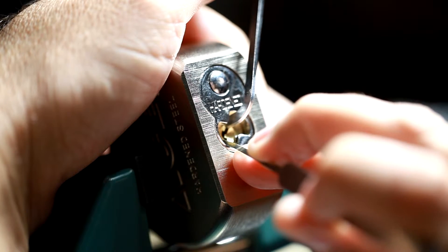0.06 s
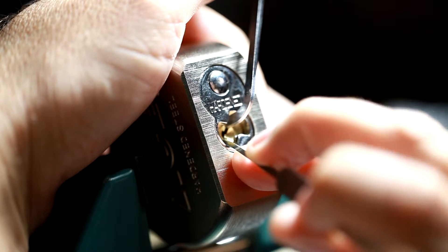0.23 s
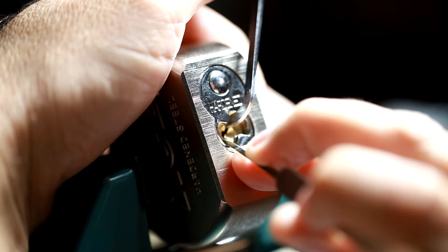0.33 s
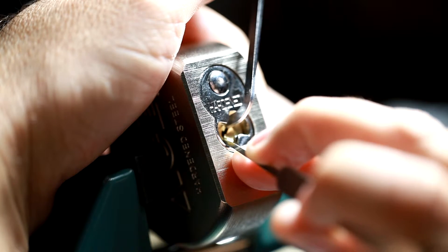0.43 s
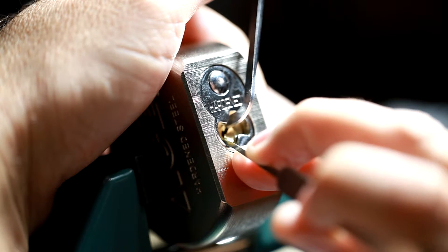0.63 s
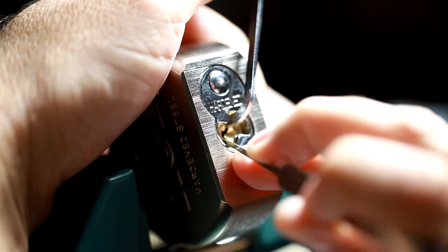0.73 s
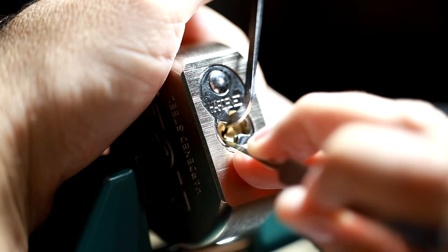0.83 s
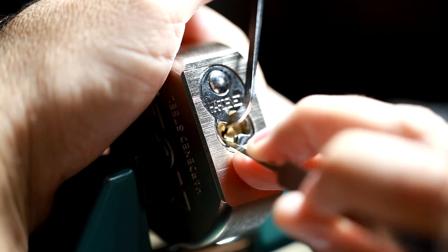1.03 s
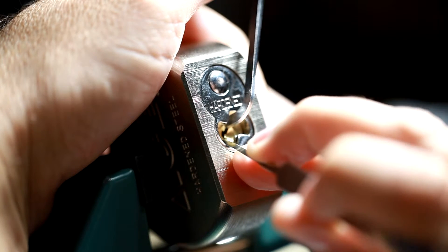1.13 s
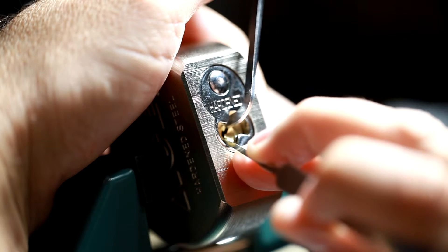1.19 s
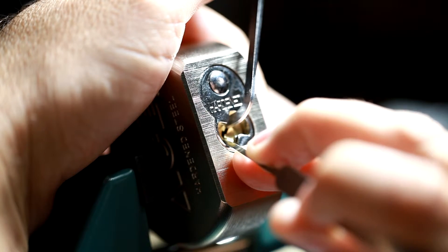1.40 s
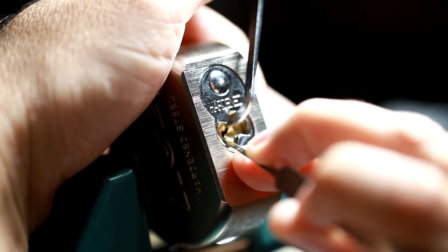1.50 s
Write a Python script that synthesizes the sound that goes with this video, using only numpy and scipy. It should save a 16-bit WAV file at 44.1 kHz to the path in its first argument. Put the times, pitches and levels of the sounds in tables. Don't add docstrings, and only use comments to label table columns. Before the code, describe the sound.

A padlock pin snaps with one sharp bright click as thin picks work it, over faint hiss

```python
import sys
import numpy as np
from scipy import signal
from scipy.fft import rfft, irfft
from scipy.io import wavfile

SR = 44100
rng = np.random.default_rng(int(sys.argv[2]) if len(sys.argv) > 2 else 0)


def decibels_to_gain(level_db):
    exponent = np.asarray(level_db, float) / 20
    return 10 ** exponent


def unload_audio(sound):
    columns = np.transpose(np.atleast_2d(sound))
    steps = np.round(np.clip(columns, -1, 1) * 32767)
    wavfile.write(sys.argv[1], SR, steps.astype(np.int16))


N = 68355


def rms_one(x):
    return x / np.sqrt(np.mean(x ** 2) + 1e-20)


def at_hz(rows, hz, column=1):
    rows = np.array(rows)
    return np.interp(np.log(hz), np.log(rows[:, 0]), rows[:, column])


def ring(clicks, hz, t60):
    radius = np.exp(-np.log(1000) / (t60 * SR))
    angle = 2 * np.pi * hz / SR
    poles = [1, -2 * radius * np.cos(angle), radius * radius]
    return signal.lfilter([0, np.sin(angle)], poles, clicks + 1e-18)


def body(clicks, modes):
    return sum((-1) ** k * decibels_to_gain(db) * ring(clicks, hz, t60) for k, (hz, db, t60) in enumerate(modes))


def clicks_at(rows):
    out = np.zeros(N)
    for s, db in rows:
        out[int(s * SR)] += decibels_to_gain(db)
    return out


def drift(rate):
    r = np.exp(-2 * np.pi * rate / SR)
    wander = signal.lfilter([1], [1, -2 * r, r * r], rng.standard_normal(N + SR))
    return rms_one(wander[SR:])


# (frequency [Hz], level [dB rms])
HUM = [(120, -74), (240, -82), (360, -86), (1953, -80), (2930, -107.5), (3906, -91.5)]
# (frequency [Hz], density [dB per Hz])
HISS = [(20, 2), (45, 1), (150, -7), (500, -6.5), (1000, -12), (3000, -17), (8000, -18.5), (16500, -20.5)]


def background():
    hz = np.maximum(np.fft.rfftfreq(N, 1 / SR), 1)
    hiss = rms_one(irfft(rfft(rng.standard_normal(N)) * decibels_to_gain(at_hz(HISS, hz)), N))
    t = np.arange(N) / SR
    tones = sum(np.sqrt(2) * decibels_to_gain(db) * np.sin(2 * np.pi * (f * t + rng.random())) for f, db in HUM)
    return decibels_to_gain(-65.5) * hiss + tones


# (frequency [Hz], tick level [dB], rubbing level [dB], t60 [s])
MOUNT = [(611.4, -24, 6.5, 0.017), (858, -24, -9.5, .05), (1172.7, -15.5, -4.5, 0.16),
         (1262, -24, -10, 0.28), (1422, -17, -7.5, 0.04), (1889, 3, 1, .04), (2273, 0, -5, 0.09),
         (2394, -19, -13.5, 0.071), (2707, 9, 5.5, 0.042), (3620, -11, -12, 0.017)]
# (time [s], level [dB])
PRESSURE = [(0, -3), (.1, 4.5), (.18, -1), (.3, 0.5), (.4, -1.5), (.65, 4), (.72, -1), (.81, 2), (.95, -1),
            (1.08, 1), (1.221, -0.5), (1.271, 3.5), (1.38, -1), (1.472, 0), (1.55, -1)]


def rubbing():
    level_db, slips_per_s, uneven_db = -65.5, 900, 3.5
    surge_db, surges_per_s = -1, 9.8
    sizes = decibels_to_gain(uneven_db * np.minimum(rng.exponential(1, N), 4)) * rng.choice([-1, 1], N)
    slipping = rng.random(N) < slips_per_s / SR
    pressure_db = np.interp(np.arange(N) / SR, *np.transpose(PRESSURE))
    slips = sizes * slipping * decibels_to_gain(pressure_db + surge_db * drift(surges_per_s))
    modes = [(hz, db, t60) for hz, _, db, t60 in MOUNT]
    return decibels_to_gain(level_db) * rms_one(body(slips, modes))


# (time [s], mount level [dB], bright level [dB], extra on low modes [dB])
TICKS = [
    (0.1214, -54, -54, 5),
    (0.2692, -54.5, -62, 6.5),
    (1.4293, -55, -55, 6.5),
    (1.537, -75, -73, 24.5),
]
# (delay [s], bright level [dB], mount level [dB])
CONTACTS = [
    (0, 0, -11),
    (.0006, -10, -14),
    (.0015, -0.5, 2.5),
    (.0031, 1, -9),
    (.0058, -8, -18.5),
]
# (frequency [Hz], level [dB], t60 [s])
PICK = [(3900, -1, 0.0033), (5270, -2.5, 0.0084), (6160, 2, 0.0032), (7150, 0, .003), (8400, 5.5, 0.004),
        (8740, -3, 0.0038), (10400, -5, .003), (12500, -5, .002)]


def ticks():
    touches = [(s + lag, high_db + db) for s, _, high_db, _ in TICKS for lag, db, _ in CONTACTS]
    out = body(clicks_at(touches), PICK)
    for s, mount_db, _, low_db in TICKS:
        modes = [(hz, db + low_db * (hz < 1500), t60) for hz, db, _, t60 in MOUNT]
        pushes = clicks_at([(s + lag, mount_db + db) for lag, _, db in CONTACTS])
        out = out + body(pushes, modes)
    return out


# (frequency [Hz], level [dB], t60 [s])
LOCK = [(1637, -26, 0.016), (2505, -23.5, 0.0083), (3890, -17.5, .006), (4710, -20, 0.00664),
        (6025, -17.5, .008), (6860, -11.5, .008), (7420, -6.5, 0.0121), (8300, 0.5, 0.0048),
        (9130, -2.5, 0.00492), (10800, -24, 0.0084), (11950, -26, .006), (12400, -16, 0.0054),
        (13160, -24, .006), (15350, -23, .005)]


def snap(damping=1):
    first_s, second_delay_s = .20795, .00036
    touches = clicks_at([(first_s, -17), (first_s + second_delay_s, -8.5)])
    return body(touches, [(hz, db, t60 * damping) for hz, db, t60 in LOCK])


KNOCKS_S = [.2095, .2174, .2535, .2670, .2800]
# (level [dB], cutoff [Hz])
THUMPS = [
    (-36, 1500),
    (-29, 240),
    (-56.5, 320),
    (-59.5, 500),
    (-47.5, 500),
]
# (frequency [Hz], level [dB], t60 [s])
VICE = [(120.3, -9, 0.024), (261.4, -5, 0.018), (373, -2.5, .05), (533, -5.5, 0.035), (816.6, -10.5, .04),
        (1378, -11.5, 0.048)]


def vice():
    knocks = np.zeros(N)
    for s, (db, cut_hz) in zip(KNOCKS_S, THUMPS):
        softness = signal.butter(1, cut_hz, fs=SR, output="sos")
        knocks = knocks + signal.sosfilt(softness, clicks_at([(s, db)]))
    return body(knocks, VICE)


# (frequency [Hz], level [dB], t60 [s])
ROOM = [(304.6, -31, 0.55), (1300, -25.5, 0.35), (2990, -31, 0.35), (5930, -23, 0.33), (8300, -37.5, 0.37),
        (11100, -40.5, 0.37), (15810, -24.5, 0.1407)]
# (delay [s], level [dB])
REFLECTIONS = [(.0040, -32.5), (.0082, -25), (.0225, -36)]


def room(x):
    first_echo_s, early_db, early_t60_s = .0016, 4.5, .025
    t = np.arange(SR // 2) / SR
    edges = 100 * 2 ** np.arange(0, 7.6, .5)
    echo = 0
    for low, high in zip(edges, edges[1:]):
        hz = np.sqrt(low * high)
        band_filter = signal.butter(2, [low, high], "band", fs=SR, output="sos")
        band = signal.sosfilt(band_filter, rng.standard_normal(len(t)))
        echo = echo + band * decibels_to_gain(at_hz(ROOM, hz) - 60 * t / at_hz(ROOM, hz, column=2))
    echo = echo * (1 + decibels_to_gain(early_db - 60 * t / early_t60_s)) * np.clip(t / first_echo_s - 1, 0, 1)
    echo = echo + clicks_at(REFLECTIONS)[:len(t)]
    return signal.fftconvolve(x, echo)[:N]


def scene():
    thumps = vice()
    walls = room(snap(damping=.35) + decibels_to_gain(-10) * thumps)
    return (snap() + thumps + walls + ticks() + rubbing() + background())[None]


def roll_off(x):
    return signal.sosfilt(signal.butter(12, 17280, fs=SR, output="sos"), x)


def record(dry):
    low_pass = signal.ellip(8, 1, 40, 15800, fs=SR, output="sos")
    mix = signal.sosfilt(low_pass, dry)
    return roll_off(mix)


dry = scene()
out = record(dry)
unload_audio(out)
```